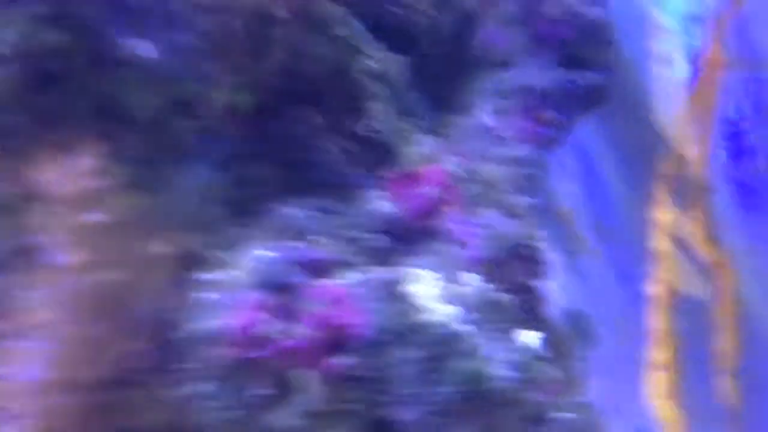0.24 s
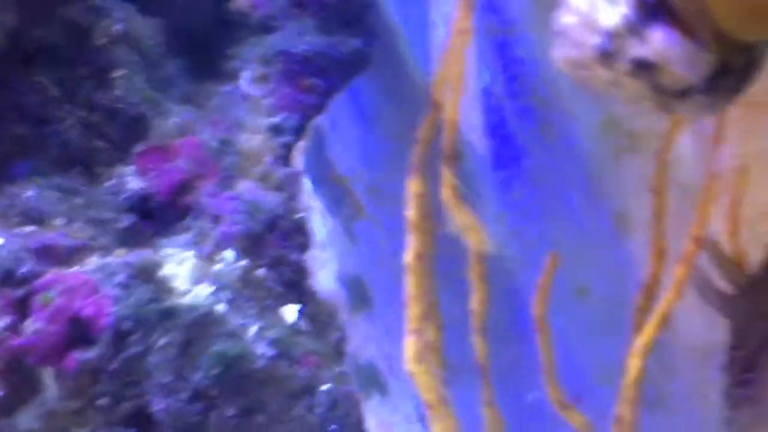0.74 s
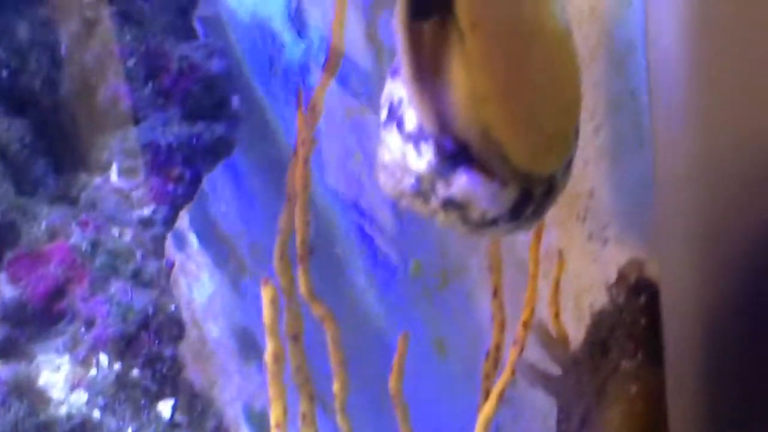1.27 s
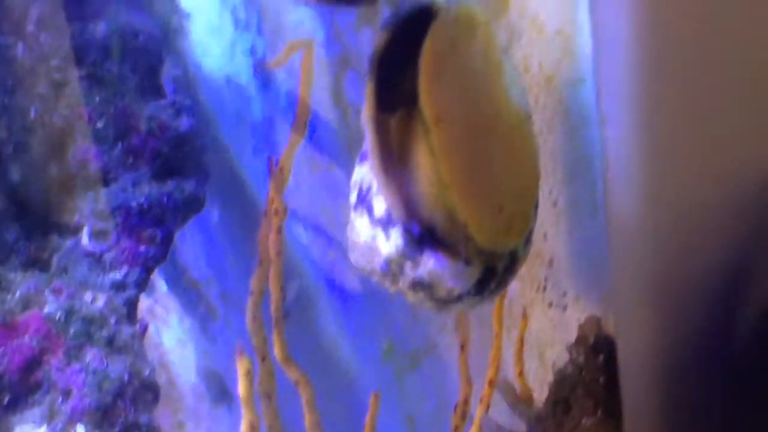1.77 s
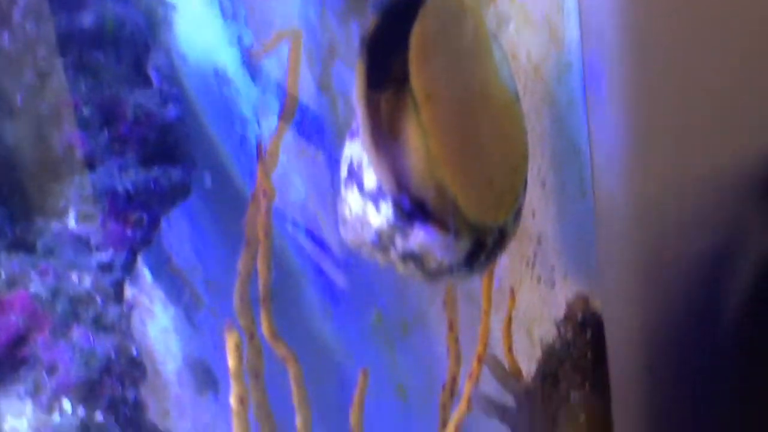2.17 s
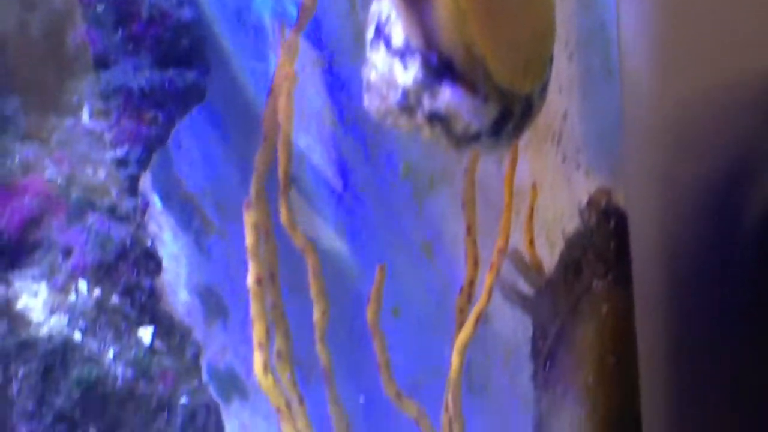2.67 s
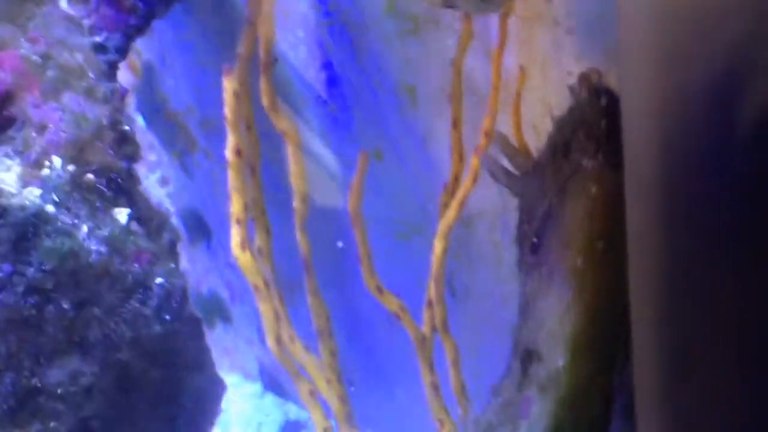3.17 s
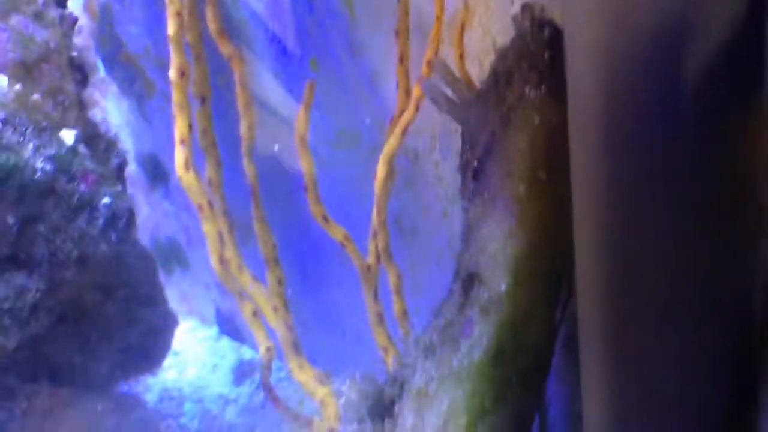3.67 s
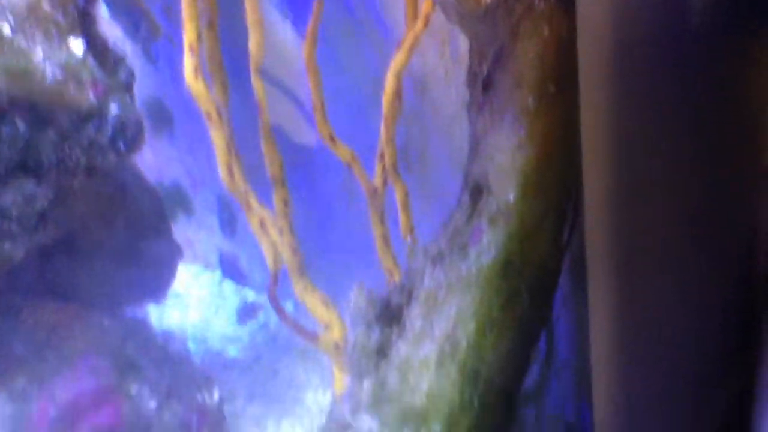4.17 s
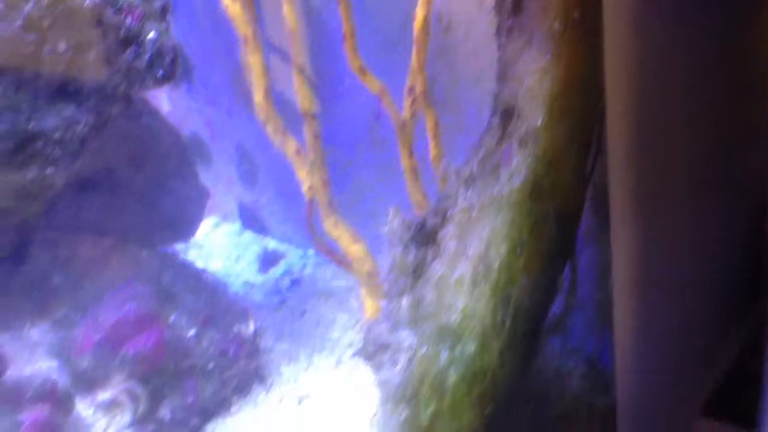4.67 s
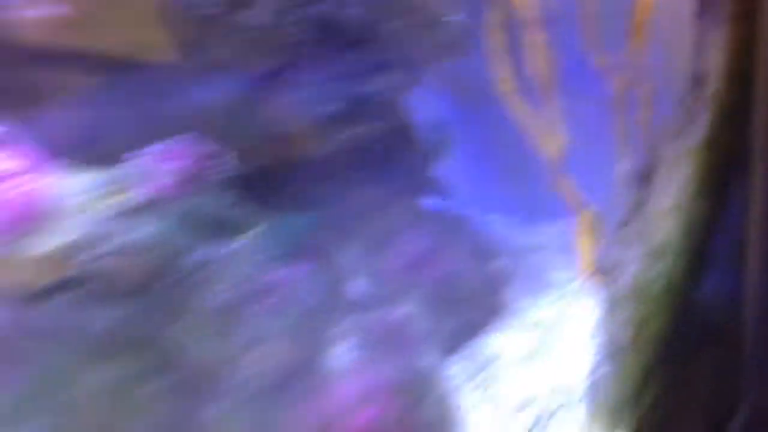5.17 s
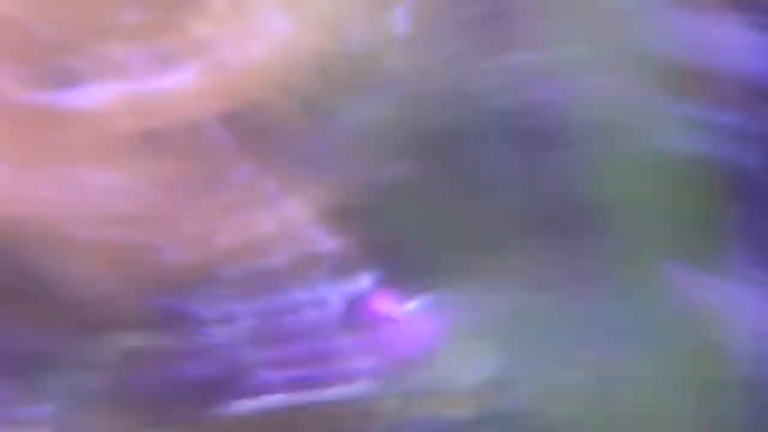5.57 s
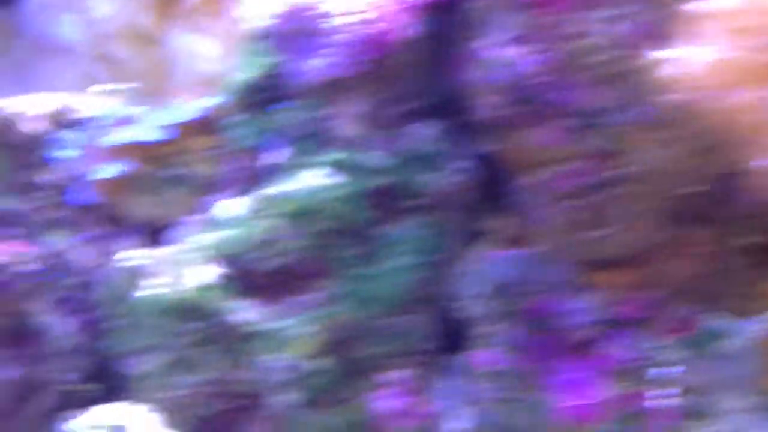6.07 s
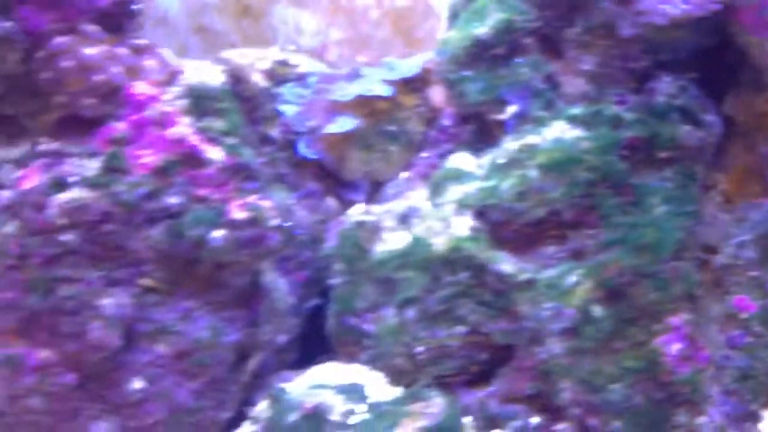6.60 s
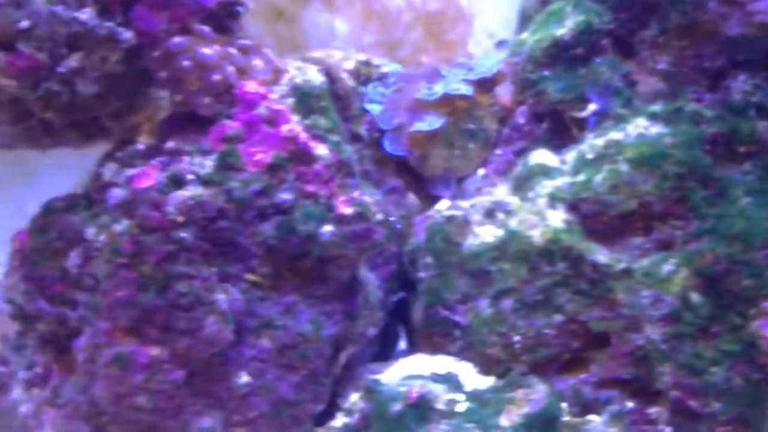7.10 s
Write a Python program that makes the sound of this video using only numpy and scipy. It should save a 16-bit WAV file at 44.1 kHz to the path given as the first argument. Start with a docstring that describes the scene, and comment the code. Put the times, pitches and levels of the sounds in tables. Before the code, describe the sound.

A close, mono pickup of an aquarium pump in a quiet room. Throughout, a steady low electrical hum near 120 and 240 Hz, with faint treble buzz and a thin steady whine around 1.5 kHz, lies over soft water wash and fine trickling. Faint rustles fill the first second, with a small tap at 0.2 s and the strongest double plastic clack at 0.58 s. Several tiny drips plink around 1 s, then it is mostly plain hum until about 3 s. Crisp bubble pops cluster from 3.4 to 3.8 s, with the clearest drip at 3.7 s and dull taps at 3.8-4.3 s. More drips come near 4.8 s. From 5 to 5.9 s the microphone turns away: the hum drops and thins, with brief low pitch sags at 5.3 and 5.6 s and light knocks at 5.2 and 6.1 s. Quieter hum, water and sparse drips, some lower, continue to about 7.3 s.

```python
"""Aquarium pump in a quiet room

The pump's coil hums at multiples of the mains, with a weak treble buzz and a thin motor whine: sums of sines.
Shaped noise makes the wash of water; noise gated by random drops makes the trickle.
Drips ring and splash, bubbles burst, and there are light knocks, faint rustles and brief low hum slides.
The microphone drifts along the glass and after five seconds turns away from the pump.
"""
import sys
import numpy as np
from scipy import signal
from scipy.fft import rfft, irfft
from scipy.io import wavfile
from scipy.ndimage import uniform_filter1d

SR = 44100
rng = np.random.default_rng(int(sys.argv[2]) if len(sys.argv) > 2 else 0)


def transcribe(signal):
    """Save signal, clipped to [-1, 1], as a 16-bit WAV file at the path in sys.argv[1]."""
    frames = np.atleast_2d(signal).T
    limited = np.clip(frames, -1, 1)
    pcm = np.round(limited * 32767).astype(np.int16)
    wavfile.write(sys.argv[1], SR, pcm)


N = 323811
TIME = np.arange(N) / SR
HIT_TIME = np.arange(SR // 3) / SR
MAINS_HZ = 59.96
TURN_S, TURN_LENGTH_S = 4.996, 0.88  # microphone turns away from the pump in one even move


def amp(db):
    """Decibels to gain."""
    return 10 ** (np.asarray(db) / 20)


def unit(x):
    """Scales to rms 1."""
    return x / np.sqrt(np.mean(x ** 2) + 1e-30)


def bell(x, centre, width):
    """Gaussian bump of height 1, falling to 1/e at one width from the centre."""
    return np.exp(-((x - centre) / width) ** 2)


def decay(t60_s):
    """Exponential decay of a hit, -60 dB after t60."""
    return amp(-60 * HIT_TIME / t60_s)


def attack(rise_s):
    """Exponential onset of a hit with time constant rise_s."""
    return 1 - np.exp(-HIT_TIME / rise_s)


def read(points, hz):
    """Interpolates a table of (f/Hz, value) on a log-frequency axis."""
    f, value = np.transpose(points)
    return np.interp(np.log(hz + 1), np.log(f + 1), value)


def add(mix, start_s, sound):
    """Mixes a sound in at a time."""
    part = mix[max(round(start_s * SR), 0):][:len(sound)]
    part += sound[:len(part)]


def noise(gain, size):
    """White noise of rms 1 coloured by gain(Hz)."""
    spectrum = rfft(rng.standard_normal(size))
    return irfft(spectrum * gain(np.fft.rfftfreq(size, 1 / SR)), size)


def drift(rate_hz):
    """Slow random wander of rms 1: noise with a Gaussian low-pass."""
    return unit(noise(lambda hz: bell(hz, 0, rate_hz), N))


def tone(hz):
    """A sine of rms 1 and random phase."""
    return np.sqrt(2) * np.sin(2 * np.pi * (hz * TIME + rng.random()))


def burst(centre_hz, octaves, t60_s):
    """A dying puff of noise in a broad band, Gaussian in octaves."""
    band = noise(lambda hz: bell(np.log2((hz + 1) / centre_hz), 0, octaves), len(HIT_TIME))
    return unit(band) * decay(max(t60_s, .002))


# room reverberation: f/Hz, t60/s
ROOM = [(200, 0.79), (1500, 0.27), (4000, 0.25), (12000, 0.26)]


def in_room(hit, wet_db, window_s=0.0022):
    """Adds a diffuse tail, each band dying at its own speed; the loudest moment peaks near 1."""
    hz, t, z = signal.stft(rng.standard_normal(len(HIT_TIME)), SR, nperseg=256)
    band_decay = amp(-60 * t / read(ROOM, hz)[:, None])
    tail = signal.istft(z * band_decay, SR, nperseg=256)[1]
    echo = signal.fftconvolve(hit, tail)[:len(hit)]
    sound = hit + amp(wet_db) * unit(echo) * hit.std()
    loudest_power = uniform_filter1d(sound ** 2, int(window_s * SR)).max()
    return sound / (2 * np.sqrt(loudest_power))


# water and room noise facing the pump and turned away: f/Hz, density/dB re WASH_DB
WASH_NEAR = [(20, -23), (45, 2.5), (85, 2.5), (200, 1.5), (330, -4.5), (450, -7), (740, -6.5), (900, -12.5),
             (1150, -8.5), (1400, -14.5), (2800, -21.5), (5000, -20.5), (8000, -23.5), (15000, -26)]
WASH_FAR = [(20, -10), (45, -8), (85, -1), (200, -3), (330, -6.5), (450, -8), (740, -10.5), (900, -14.5),
            (1150, -15.5), (1400, -15.5), (2100, -17.5), (2800, -22.5), (5000, -24), (8000, -25),
            (15000, -26.5)]
WASH_DB = -86  # per Hz


def wash(away, churn_db=1.5, churn_hz=9, churn_top_hz=2500):
    """Churning water and room noise; the hiss above it stays smooth."""
    churn = amp(churn_db * drift(churn_hz))
    near = noise(lambda hz: amp(read(WASH_NEAR, hz) + WASH_DB), N)
    far = noise(lambda hz: amp(read(WASH_FAR, hz) + WASH_DB), N)
    both = np.sqrt(SR / 2) * (np.sqrt(1 - away) * near + np.sqrt(away) * far)
    low = signal.sosfiltfilt(signal.butter(2, churn_top_hz, fs=SR, output="sos"), both)
    return both + (churn - 1) * low


# resonances of the air space above the water: f/Hz, width/Hz, level/dB
TRICKLE_MODES = [(2010, 400, 3.5), (2820, 140, 2.5), (3930, 1100, 10.5), (5500, 670, -2.5)]
TRICKLE_NEAR_DB, TRICKLE_FAR_DB = -73, -78  # facing the pump, turned away
TRICKLE_PER_S, TRICKLE_DECAY_S = 1500, 0.0083  # mean drop rate, time constant


def trickle(away, spread_db=4.5, flutter_db=1.5, flutter_hz=12):
    """Countless tiny drops at the outlet ring the air space: resonant noise gated by random drops."""
    strength = amp(spread_db * np.minimum(rng.exponential(1, N), 4))
    drops = (rng.random(N) < TRICKLE_PER_S / SR) * strength
    density = signal.lfilter([1], [1, -np.exp(-1 / (TRICKLE_DECAY_S * SR))], drops)
    ring = noise(lambda hz: sum(amp(db) / (1 + (2 * (hz - f) / w) ** 2) for f, w, db in TRICKLE_MODES), N)
    level_db = (1 - away) * TRICKLE_NEAR_DB + away * TRICKLE_FAR_DB
    return amp(level_db + flutter_db * drift(flutter_hz)) * unit(ring * density)


# faint rustles: t/s, length/s, level/dB
RUSTLES = [(0, 0.25, -71), (0.22, 0.36, -62.5), (0.55, 0.6, -75)]
# their broad bands: f/Hz, width/Hz, level/dB
RUSTLE_PEAKS = [(825, 240, 11), (2180, 810, -0.5), (5400, 990, -0.5)]


def rustle(flutter_db=2, flutter_hz=18):
    """Uneven, soft noise in three broad bands, each rustle swelling and fading in one arch."""
    level = np.zeros(N)
    for start_s, length_s, db in RUSTLES:
        arch = np.sin(np.linspace(0, np.pi, int(length_s * SR)))
        add(level, start_s, amp(db) * arch)
    band = noise(lambda hz: sum(amp(db) * bell(hz, f, w) for f, w, db in RUSTLE_PEAKS), N)
    return level * amp(flutter_db * drift(flutter_hz)) * unit(band)


# knocks: t/s, peak level/dB, centre f/Hz, t60/s, click/dB
KNOCKS = [(0.1842, -42.5, 600, 0.016, -16.5), (0.5772, -33, 1710, 0.033, -7),
          (0.5822, -32.5, 420, 0.028, -28), (3.835, -48, 950, .08, -22), (4.11, -52.5, 1260, 0.18, -24),
          (4.255, -56, 2100, 0.19, -18), (5.203, -46, 1090, 0.12, -15), (6.107, -50, 750, 0.056, -22)]
# modes of the plastic: f/Hz, level/dB, t60/s
KNOCK_MODES = [(189, 9, 0.048), (554, 9, 0.026), (770, 13, 0.029), (1000, -15, .025), (1360, -8, 0.028),
               (2270, -1, 0.045), (2430, 0, 0.036), (2770, 4, 0.036)]
KNOCK_RISE_SHARE, KNOCK_RISE_LAW = 0.07, 1.4  # rise as a share of a 0.1 s decay; longer blows are much softer
KNOCK_RING_DB, KNOCK_RING_DB_PER_DB = -18.5, 0.45  # modes in a blow of -48 dB; harder blows ring more


def knocks(body_octaves=1.36, click_hz=7000, click_octaves=1.0, click_share=1.0, wet_db=-11):
    """Light blows on plastic: a dull clack, a bright click and a few quickly damped modes."""
    out = np.zeros(N)
    for start_s, db, centre_hz, t60_s, click_db in KNOCKS:
        rise_s = KNOCK_RISE_SHARE * .1 * (t60_s / .1) ** KNOCK_RISE_LAW
        ring_db = KNOCK_RING_DB + KNOCK_RING_DB_PER_DB * (db + 48)
        ring = np.zeros(len(HIT_TIME))
        for hz, mode_db, mode_t60_s in KNOCK_MODES:
            mode = np.sin(2 * np.pi * (hz * HIT_TIME + rng.random()))
            ring += amp(mode_db) * decay(mode_t60_s) * mode
        clack = burst(centre_hz, body_octaves, t60_s)
        click = burst(click_hz, click_octaves, click_share * t60_s)
        hit = clack + amp(click_db) * click + amp(ring_db) * ring
        add(out, start_s, amp(db) * in_room(hit * attack(rise_s), wet_db))
    return out


# bursting bubbles: t/s, peak level/dB, centre f/Hz, t60/s
POPS = [(0.185, -49.5, 10000, 0.012), (0.927, -53, 5200, 0.056), (1.018, -58, 9000, 0.089),
        (3.185, -60.5, 9500, .08), (3.385, -56, 2690, .18), (3.49, -47, 5840, .11),
        (3.565, -57.5, 4180, .12), (3.645, -54.5, 5370, 0.22), (3.697, -53, 7000, .04),
        (3.76, -59, 3300, 0.099), (4.596, -48, 5500, 0.11), (5.262, -49.5, 3970, .06),
        (5.268, -55.5, 9250, 0.082), (5.531, -60, 6300, .08), (6.945, -62, 9300, .07)]
POP_RISE_SHARE = 0.049  # of t60


def pops(octaves=0.91, wet_db=-5):
    """Bubbles burst at the surface with a short, bright spit of noise."""
    out = np.zeros(N)
    for start_s, db, centre_hz, t60_s in POPS:
        hit = burst(centre_hz, octaves, t60_s) * attack(POP_RISE_SHARE * t60_s)
        add(out, start_s, amp(db) * in_room(hit, wet_db))
    return out


# drips: t/s, peak level/dB before trim_db, ring start f/Hz, splash/dB, room/dB
DRIPS = [(0.336, -51, 4830, -6, -2), (0.5667, -48, 4200, -4, -12), (0.7343, -51, 4010, 0, 4),
         (0.986, -49, 4170, -7, 4), (0.992, -43.5, 3840, -8, -1), (1.024, -46.5, 4000, -5, 0),
         (2.4256, -53.5, 3960, -1, 0), (2.9733, -48, 4130, -2, -8), (3.694, -38, 4030, -3, -3.5),
         (4.287, -47, 3760, -1, 14), (4.7494, -50, 4130, -7, 1), (4.76, -47, 3930, -6, 3),
         (4.828, -47, 4080, -6, -3), (4.9142, -52, 3750, 0, 1), (5.207, -53, 4150, 1, 8),
         (5.4804, -49.5, 4030, -4, 4), (5.759, -45, 2490, 1, -2.5), (5.776, -48, 3900, 2, -3),
         (6.0556, -54.5, 4170, -5, -1), (6.109, -53.5, 4060, -3, 5), (6.317, -46.5, 4010, 0, -1),
         (6.524, -46, 2895, 1, 2), (6.7785, -47.5, 2030, -18, -12), (6.8703, -51.5, 3960, -5, -1),
         (7.146, -53, 2040, -1, 8)]
DRIP_T60_S = 0.024


def drips(rise=.02, splash_hz=3900, splash_follow=0.45, splash_octaves=0.52, splash_t60_s=0.015,
          attack_s=0.0012, trim_db=-1):
    """Each drip traps a small bubble that rings, rising slightly; its splash pitch partly follows the ring."""
    out = np.zeros(N)
    glide = 1 + rise * np.minimum(HIT_TIME / DRIP_T60_S, 1)
    for start_s, db, hz, splash_db, wet_db in DRIPS:
        ring = np.sin(2 * np.pi * np.cumsum(hz * glide) / SR) * decay(DRIP_T60_S)
        centre_hz = splash_hz * (hz / splash_hz) ** splash_follow
        splash = burst(centre_hz, splash_octaves, splash_t60_s)
        hit = (ring + amp(splash_db) * splash) * attack(attack_s)
        add(out, start_s, amp(db + trim_db) * in_room(hit, wet_db))
    return out


# motor whine along the microphone's path: t/s, level/dB before trim_db
WHINE = [(0.15, -65.5), (2.38, -64), (4.81, -75), (4.87, -80), (5.09, -73), (5.45, -73), (6.12, -68),
         (6.56, -76), (6.76, -72.5), (7.3, -73)]
# its partials: multiple of WHINE_HZ, level/dB
WHINE_PARTIALS = [(1, 1), (2, -22), (3, -16), (4, -30)]
WHINE_HZ = 1477.35


def whine(trim_db=1.17):
    """A clean motor tone of steady pitch with weak harmonics."""
    t, db = np.transpose(WHINE)
    level_db = np.interp(TIME, t, db)
    partials = sum(amp(db) * tone(k * WHINE_HZ) for k, (_, db) in enumerate(WHINE_PARTIALS, 1))
    return amp(level_db + trim_db) * partials


# faint buzz of the pump housing, per odd multiple: f/Hz, level/dB before the random spread
BUZZ = [(1500, -101), (3000, -83), (4000, -85.5), (4800, -87.5), (5500, -88), (6400, -88), (7500, -100)]


def buzz(spread_db=3):
    """Weak odd multiples of the mains, of uneven strength, reach into the treble."""
    out = np.zeros(N)
    for hz in MAINS_HZ * np.arange(27, 121, 2):
        uneven_db = spread_db * (rng.uniform(-1.15, 1) - 2.5)
        out += amp(read(BUZZ, hz) + uneven_db) * tone(hz)
    return out


# low hum slides, from the recorder's wind filter:
# t/s, length/s, level/dB, first f/Hz, last f/Hz, filter's dip of the second hum multiple/dB
HUM_SLIDES = [(0.581, 0.088, -60, 129, 55, -18), (5.265, 0.1, -54.5, 115, 62, -4),
              (5.338, 0.05, -56, 65, 40, -6), (5.617, 0.071, -53, 134, 69, -1)]


def hum_slides(rough=0.24, rough_hz=35):
    """The recorder's wind filter cuts in and the low hum briefly sags in pitch: uneven falling sines."""
    out = np.zeros(N)
    for start_s, length_s, db, first_hz, last_hz, _ in HUM_SLIDES:
        hz = np.geomspace(first_hz, last_hz, int(length_s * SR))
        slide = np.sin(2 * np.pi * np.cumsum(hz) / SR)
        add(out, start_s, amp(db) * signal.windows.tukey(len(hz), .5) * slide)
    return out * (1 + rough * drift(rough_hz))


# hum facing the pump and turned away: multiple of the mains, level/dB re HUM_NEAR_DB, HUM_FAR_DB
HUM_NEAR = [(1, -13.5), (2, 0), (3, -15), (4, -2), (5, -23.5), (6, -19.5), (7, -24), (8, -27), (9, -19.5),
            (10, -15.5), (11, -13), (12, -33), (13, -19), (14, -39.5), (15, -27), (16, -34), (17, -31.5),
            (18, -26.5), (19, -19), (20, -25.5), (21, -37), (22, -41)]
HUM_FAR = [(1, -14), (2, 5), (3, -6.5), (4, 13), (5, -5.5), (6, 1), (7, -23), (8, -8), (9, -9), (10, -7),
           (11, 1.5), (12, -31), (13, -8.5), (14, -36), (15, -23), (16, -44), (17, -12), (18, -10),
           (19, -7), (20, -11), (21, -20), (22, -37)]
HUM_NEAR_DB, HUM_FAR_DB = -52, -68.5
# a tank panel radiates the hum around one pitch, most as the microphone passes it
PANEL_HZ, PANEL_WIDTH_HZ = 1100, 200
PANEL_PASS_S, PANEL_PASS_WIDTH_S, PANEL_PASS_DB, PANEL_REST_DB = 5.4, 0.65, 6, -0.5
NODE_DB_PER_S = 10  # from TURN_S the microphone slides into a quiet spot of the fourth multiple
# the recorder's wind filter briefly dips the second multiple after each slide starts
FILTER_DIP_DELAY_S, FILTER_DIP_WIDTH_S = 0.047, 0.061


def hum(away, waver_db=1.5, waver_hz=3.0, drone_waver_db=0.13):
    """The pump's coil shakes the tank at multiples of the mains, steadiest at twice and four times it."""
    panel_db = PANEL_REST_DB + PANEL_PASS_DB * bell(TIME, PANEL_PASS_S, PANEL_PASS_WIDTH_S)
    filter_db = np.zeros(N)
    for start_s, *_, dip_db in HUM_SLIDES:
        filter_db += dip_db * bell(TIME, start_s + FILTER_DIP_DELAY_S, FILTER_DIP_WIDTH_S)
    node_db = -NODE_DB_PER_S * np.maximum(TIME - TURN_S, 0)
    drone_db = {2: filter_db, 4: node_db}
    out = np.zeros(N)
    for k, ((_, near), (_, far)) in enumerate(zip(HUM_NEAR, HUM_FAR), 1):
        hz = k * MAINS_HZ
        db = (1 - away) * (near + HUM_NEAR_DB) + away * (far + HUM_FAR_DB) + drone_db.get(k, 0)
        db += (drone_waver_db if k in drone_db else waver_db) * drift(waver_hz)
        db += panel_db * bell(hz, PANEL_HZ, PANEL_WIDTH_HZ)
        out += amp(db) * tone(hz)
    return out


def scene():
    """Pump and water, heard in mono on both channels."""
    away = np.clip((TIME - TURN_S) / TURN_LENGTH_S, 0, 1)
    water = wash(away) + trickle(away) + drips() + pops()
    pump = hum(away) + hum_slides() + buzz() + whine()
    mono = water + rustle() + knocks() + pump
    return np.array([mono, mono])


EDGE_HZ = 15350


def record(dry):
    """The recorder's band limit: a steep linear-phase low-pass."""
    lowpass = signal.firwin(767, EDGE_HZ, window=("kaiser", 9), fs=SR)
    return signal.oaconvolve(dry, lowpass[None], "same")


dry = scene()
out = record(dry)
transcribe(out)
```